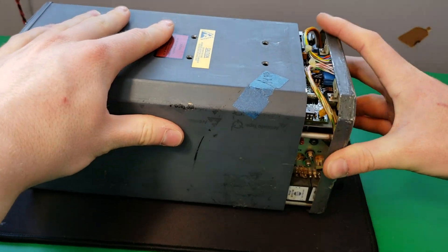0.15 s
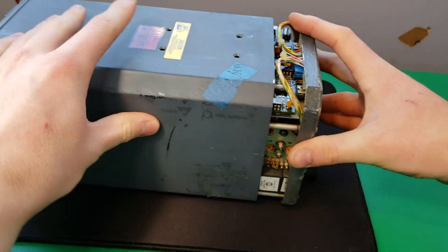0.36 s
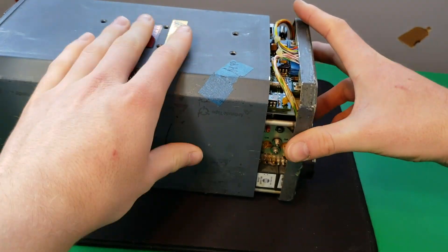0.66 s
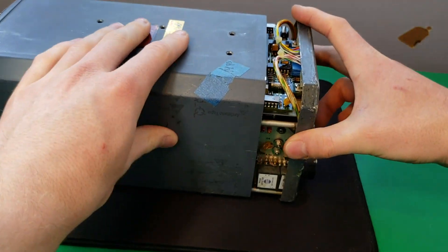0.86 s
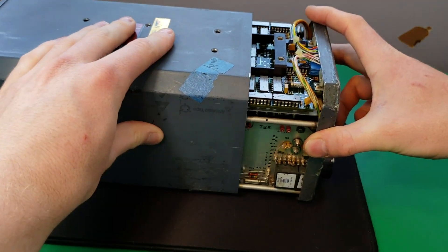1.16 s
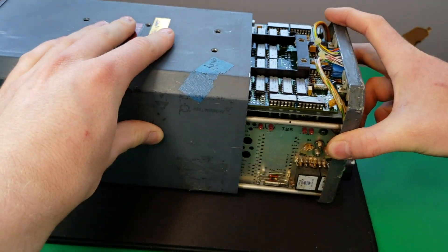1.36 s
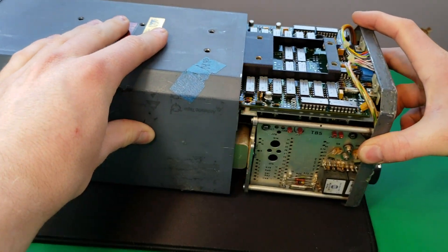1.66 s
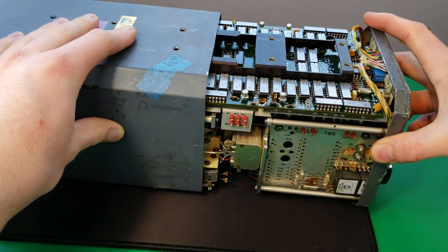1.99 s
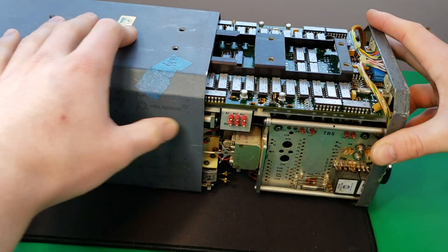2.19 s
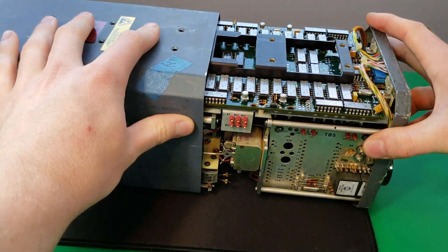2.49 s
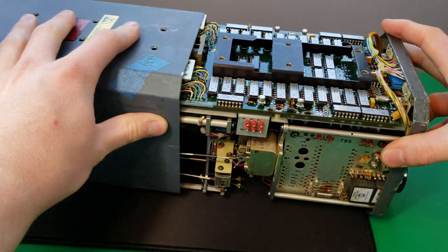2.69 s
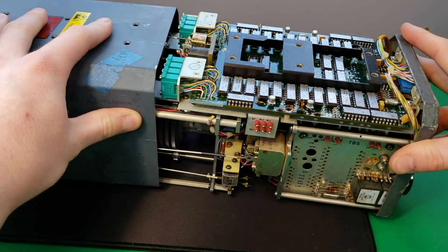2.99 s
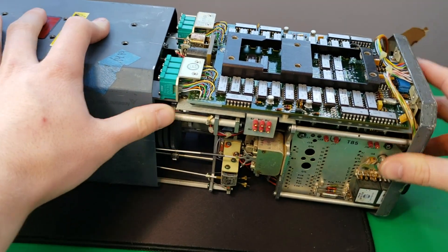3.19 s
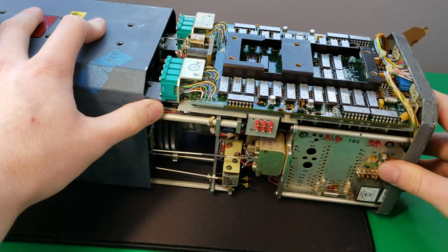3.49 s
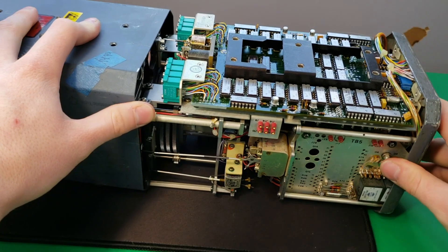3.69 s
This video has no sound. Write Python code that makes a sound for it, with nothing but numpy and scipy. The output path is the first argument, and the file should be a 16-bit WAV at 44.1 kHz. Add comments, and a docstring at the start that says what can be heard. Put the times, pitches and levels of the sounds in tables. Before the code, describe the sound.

Gritty metal scraping in short pulls, then a hard metallic clack as a case slips free

```python
"""Gritty scraping and sharp metal knocks: a thick metal case is pulled off a chassis in several strokes
on a workbench, near a stereo microphone in a small quiet room.
Fine grit hisses as filtered clicks; coarser slips ring the modes of the walls and single walls sing briefly.
Half-sine pushes ring case, chassis and bench, and noise bursts make the cracks of edge on edge.
A short echo, steady air and a faint wavering hum lie behind."""
import sys
import numpy as np
from scipy import signal
from scipy.io import wavfile
from scipy.ndimage import uniform_filter1d

SR = 44100
rng = np.random.default_rng(int(sys.argv[2]) if len(sys.argv) > 2 else 0)


def to_wav(sig):
    """Store sig (one row per channel, or 1-D mono) as 16-bit WAV at the path in sys.argv[1].

    Samples outside -1..1 are clipped; the rate is SR.
    """
    pcm = np.clip(np.atleast_2d(sig), -1, 1) * 32767
    pcm = np.round(pcm).astype(np.int16)
    wavfile.write(sys.argv[1], SR, pcm.T)  # frames by channels


N = 169785  # length [samples]

FREE_S = 2.845  # the case has come free from here on [s]
MONO_HZ = 450  # below this the echo is centred and modes have a smaller phase gap [Hz]


def amp(db):
    """Turns decibels into a linear gain."""
    return 10 ** (np.asarray(db) / 20)


def evened(x):
    """Scales a signal to an RMS of 1."""
    return x / np.sqrt(np.mean(x ** 2) + 1e-20)


def wander(samples):
    """Smoothed noise with an RMS of 1, for slow changes of level."""
    return evened(uniform_filter1d(rng.standard_normal(N), size=samples))


def read(points, hz):
    """Reads a table of values over pitch, interpolating on a log pitch axis."""
    f, value = np.transpose(points)
    return np.interp(np.log(hz + 1), np.log(f + 1), value)


def clicks(per_s, spread_db):
    """A random train of clicks of either sign; a wider spread makes a few of them large."""
    size = amp(spread_db * np.minimum(rng.exponential(1, N), 5)) * rng.choice([-1., 1.], N)
    return evened(size * (rng.random(N) < per_s / SR))


def ring(drive, hz, t60):
    """One mode that passes no steady push; a click of size 1 rings it with height 1."""
    r, w = amp(-60 / (t60 * SR)), 2 * np.pi * hz / SR
    return signal.lfilter([.5, 0, -.5], [1, -2 * r * np.cos(w), r * r], drive)


# Likeness of the two channels: (pitch [Hz], left-right likeness [0-1, clipped])
LIKENESS = [(60, 0.93), (180, 0.9), (550, 0.82), (1650, 0.41), (4970, 0.17), (15000, -0.02)]


def pair(left, other, spectrum, patch_db, size):
    """Colours a drive, adds drifting patches and makes a right channel that is partly unrelated."""
    hz, _, a = signal.stft(left, SR, nperseg=size)
    b = signal.stft(other, SR, nperseg=size)[2]
    patches = uniform_filter1d(rng.standard_normal(a.shape), size=max(6, size // 128), axis=0)
    patches = evened(uniform_filter1d(patches, size=6, axis=1))
    same = np.clip(read(LIKENESS, hz), 0, 1)[:, None]
    right = same * a + np.sqrt(1 - same ** 2) * b
    colour = amp(read(spectrum, hz)[:, None] + patch_db * patches)
    return evened(signal.istft(np.array([a, right]) * colour, SR, nperseg=size)[1][:, :N])


WIDE = .45  # share of the phase gap that the likeness would give


def sides(x, hz):
    """A mode reaches the two ports with a phase gap; small for low modes, large for high ones."""
    gap = np.arccos(np.clip(read(LIKENESS, hz), 0, 1))
    turn = WIDE * gap * min(hz / MONO_HZ, 1) ** 2 * rng.choice([-1, 1])
    quarter = np.gradient(x) / np.sin(2 * np.pi * hz / SR)  # the mode a quarter cycle away
    return np.cos(turn) * x + np.sin(turn) * np.array([quarter, -quarter])


# Friction, one list for each stroke: (time [s], grit hiss level [dB], slips in low walls level [dB],
# slips in high walls level [dB], bench rumble level [dB])
FRICTION_STROKES = [
    [(0.0, -64, -72, -85, -64), (0.012, -47, -48.5, -60, -72), (0.028, -64, -60.5, -67, -61.5),
     (0.102, -75, -91, -85, -84), (0.114, -83, -73, -83, -67), (0.144, -74.5, -76, -89, -74),
     (0.216, -65, -71.5, -72, -69), (0.254, -57, -71, -84, -84), (0.296, -55, -74, -86, -79),
     (0.354, -58, -96, -91, -81), (0.5, -84, -98, -90, -80)],
    [(0.52, -77, -80, -88, -70), (0.576, -70.5, -78, -89, -64.5), (0.588, -69, -57, -66, -56),
     (0.728, -88, -77, -102, -77.5), (0.832, -51.5, -58.5, -67, -70), (0.878, -50, -51.5, -50.5, -77),
     (0.906, -41, -61, -66, -82), (0.916, -39, -47, -49, -70), (1.0, -41.5, -50, -54, -60),
     (1.036, -54, -64, -60, -69), (1.08, -57, -63.5, -59.5, -69)],
    [(1.1, -53.5, -58.5, -65, -74), (1.17, -49.5, -61, -58, -65), (1.344, -46, -57.5, -52.5, -91),
     (1.39, -47.5, -51.5, -62, -53.5), (1.546, -50.5, -52.5, -55.5, -69), (1.566, -42, -60, -60, -64),
     (1.612, -44, -56, -54, -75), (1.724, -44.5, -56, -58, -75), (1.768, -50, -61, -64, -73),
     (1.802, -62, -63, -67, -84), (1.83, -65, -60, -69, -72)],
    [(1.845, -65, -58, -78, -80), (1.861, -51, -43, -60, -81), (1.879, -49.5, -62.5, -64, -72),
     (1.893, -44.5, -73, -63, -68), (1.909, -42, -49, -46.5, -67), (1.931, -43.5, -60.5, -53, -68),
     (1.967, -47, -55, -76, -71), (1.997, -62, -64, -98, -90), (2.005, -77, -54, -84, -80),
     (2.031, -87, -68.5, -80, -66.5), (2.1, -84, -78, -98, -88)],
    [(2.12, -76, -89, -97, -71), (2.17, -69.5, -84, -75, -77), (2.22, -78, -93, -95, -83),
     (2.282, -73, -69.5, -76, -79), (2.408, -75.5, -79, -79, -67), (2.456, -79, -71, -75.5, -81),
     (2.532, -44.5, -54, -58, -72.5), (2.562, -46, -54, -49, -65.5), (2.59, -50, -47.5, -54.5, -58.5),
     (2.664, -44.5, -59, -64, -62), (2.69, -47, -49.5, -60, -54.5)],
    [(2.735, -33.5, -33, -35, -37.5), (2.751, -39.5, -46.5, -46, -37), (2.763, -32.5, -42, -34.5, -47.5),
     (2.797, -35.5, -42.5, -69, -51), (2.827, -46.5, -56.5, -58, -51), (2.859, -58, -48.5, -59, -73),
     (2.871, -80, -68, -71, -60), (2.963, -97, -78, -93, -67.5), (3.003, -80, -69.5, -90, -92),
     (3.05, -84, -97, -96, -78)],
    [(3.1, -83, -99, -95, -93), (3.308, -87, -91, -95, -78), (3.338, -75.5, -67, -100, -67.5),
     (3.43, -67, -64.5, -75, -93), (3.484, -51.5, -57, -79, -69), (3.538, -57, -59.5, -67, -85),
     (3.64, -63.5, -65, -87, -92), (3.676, -57.5, -57, -87, -83), (3.728, -52, -57, -90, -90),
     (3.77, -51, -51.5, -64, -72), (3.85, -57, -52, -86, -72)],
]


def friction_levels():
    """Gain over time of the four layers of friction: the course of the pulling strokes."""
    s, *dbs = np.vstack(FRICTION_STROKES).T
    return [amp(np.interp(np.arange(N) / SR, s, db)) for db in dbs]


# Colour of fine grit, for the hiss and the cracks: (pitch [Hz], relative level per Hz [dB])
GRIT_COLOUR = [(530, -26.5), (900, 0), (1020, -26.5), (1310, -8), (1490, -9.5), (1660, -9.5), (2360, -7),
               (2730, -6), (3910, -5), (5550, -6), (7230, -6.5), (9200, -11), (10800, -5.5), (15100, -4),
               (16000, -8.5)]
GRIT_PER_S, GRIT_PATCH_DB = 6000, 1.5  # clicks [1/s], depth of the patches [dB]
FLICKER_DB = 0.5


def grit_hiss(hiss):
    """Fine grit at the sliding edges: dense equal clicks blur into a hiss whose level flickers."""
    flicker = amp(FLICKER_DB * wander(500))
    drives = [clicks(GRIT_PER_S, spread_db=0) for _ in range(2)]
    return hiss * flicker * pair(*drives, GRIT_COLOUR, GRIT_PATCH_DB, size=512)


SLIPS_PER_S, SLIP_SPREAD_DB = 1500, 2.5
WANDER_DB, WANDER_S, DRIFT = 2.5, .03, .02  # level swing [dB], step [s], share of the pitch


def slips(modes, gain):
    """Coarse slips ring each wall; the contact moves, so each mode comes, goes and drifts in pitch."""
    out, t = np.zeros((2, N)), np.arange(N) / SR
    drive = clicks(SLIPS_PER_S, SLIP_SPREAD_DB)
    power = sum(amp(2 * db) * t60 for hz, db, t60 in modes) * SR / (4 * np.log(1000))
    for hz, db, t60 in modes:
        swell, bend = (np.interp(t / WANDER_S, np.arange(400), v) for v in rng.standard_normal((2, 400)))
        turn = np.exp(2j * np.pi * np.cumsum(hz * (1 + DRIFT * bend)) / SR)
        push = drive * gain * amp(db + WANDER_DB * swell) / turn
        # decay at zero pitch, then turn up to the drifting pitch
        rung = signal.lfilter([1], [1, -amp(-60 / (t60 * SR))], push)
        out += sides((turn * rung).real, hz)
    return out / np.sqrt(power)


# Modes of the walls and the bench: (pitch [Hz], relative level [dB], t60 [s])
# low walls while the case is still on
LOW_WALLS = [(360, -17, 0.03), (375, -2, 0.1), (424.4, -2.5, 0.05), (623, 5, 0.045), (709, -0.5, 0.094),
             (800, -13.5, 0.027), (886, -14, .065)]
# the same walls once the case has come free
FREE_WALLS = [(387.5, -3.5, 0.16), (428, 2, 0.11), (568, 2.5, 0.069), (632, 5, 0.072), (927, -7, 0.11),
              (1097, -4.5, .13), (1790, -6, 0.098), (1990, -22, 0.095)]
# high walls
HIGH_WALLS = [(1223, -2, .05), (1334, -3, 0.15), (1453, 2.5, 0.089), (1557, -7.5, 0.13), (1980, 1, 0.12),
              (2475, -3, 0.048), (3003, 5.5, 0.059), (3430, 8.5, 0.026), (4070, 7, 0.035)]
# bench top
BENCH_MODES = [(60.5, -10.5, 0.071), (81.5, -8, 0.12), (104.3, 0, 0.15), (147, -5.5, 0.12),
               (195, -15.5, 0.05)]


def wall_slips(low, high, rumble):
    """Slips in the case walls and the bench; the low walls change modes when the case comes free."""
    free = np.arange(N) > FREE_S * SR
    walls = slips(LOW_WALLS, low * ~free) + slips(FREE_WALLS, low * free) + slips(HIGH_WALLS, high)
    return walls + slips(BENCH_MODES, rumble)


# Modes of the chassis: (pitch [Hz], relative level [dB], t60 [s])
CHASSIS_MODES = [(335.3, 3, 0.064), (402, -0.5, 0.088), (530, 0, 0.083), (584, -8, 0.12), (780, -2.5, .04),
                 (1180, 7, 0.085), (1600, -5, .06), (1910, -10, 0.1), (2800, -6, .08)]
SPOT_DB, SPOT_OCTAVES = 13.5, 0.2  # boost near the favoured pitch and its spread
BENCH_CONTACT_MS, RISE_CYCLES = 7.5, .22  # bench push length, build-up time of a mode in cycles
HIGH_KNOCK_DB = 4.5  # extra level of the high walls in a knock


def knock(case, case_db, chassis_db, bench_db, contact_ms, spot_hz):
    """A half-sine push; the spot where it lands favours the modes near one pitch."""
    ms = np.arange(SR // 2) * 1000 / SR
    high = [(hz, db + HIGH_KNOCK_DB, t60) for hz, db, t60 in HIGH_WALLS]
    bodies = ((case + high, case_db, contact_ms),
              (CHASSIS_MODES, chassis_db, contact_ms),
              (BENCH_MODES, bench_db, BENCH_CONTACT_MS))
    out = np.zeros((2, len(ms)))
    for modes, blow_db, width in bodies:
        push = np.sin(np.pi * np.clip(ms / max(width, .05), 0, 1))
        body = 0
        for hz, db, t60 in modes:
            spot_db = SPOT_DB * np.exp(-(np.log2(hz / spot_hz) / SPOT_OCTAVES) ** 2)
            rise = 1 - np.exp(-ms * hz / (1000 * RISE_CYCLES))
            body = body + sides(amp(db + spot_db) * rise * ring(push, hz, t60), hz)
        out -= amp(blow_db) * body / abs(body.mean(0)).max()
    return out


# Knocks: (time [s], case level [dB], chassis level [dB], bench level [dB],
# contact on case and chassis [ms], favoured pitch [Hz])
KNOCK_BLOWS = [(0.016, -66, -55, -57, 0.29, 720), (0.543, -62, -58, -56, 0.96, 350),
               (0.5852, -38, -50, -46, 0.8, 385), (0.591, -36, -45, -58.5, 0.92, 377),
               (0.602, -44, -37, -62, 1.96, 385), (0.913, -33.5, -36.5, -56, 0.18, 361),
               (1.377, -34, -54, -56, 0.67, 377), (1.408, -33, -67, -64, 1.2, 360),
               (1.614, -41.5, -52, -74, 0.59, 616), (1.857, -35, -47.5, -54, 0.48, 657),
               (2.003, -43.5, -48, -68, 0.83, 367), (2.469, -54, -64, -67.5, 1.3, 400),
               (2.593, -36.5, -59.5, -59, 0.89, 354), (2.702, -19.5, -5, -29.5, 1.06, 489),
               (2.7114, -27, -12, -29.5, 1.2, 380), (2.7165, -22, -20, -27.5, 0.27, 705),
               (2.7274, -29, -16.5, -24, 0.81, 342), (2.85, -36, -56, -64, 0.63, 640),
               (3.775, -35, -59, -56, 0.65, 399), (3.839, -44, -44.5, -67, 0.8, 415)]
KNOCK_LOW_HZ = 55  # knocks are thinned below this


def knocks():
    """Each knock rings case, chassis and bench; the case has other modes once it is free."""
    out = np.zeros((2, N))
    for s, *blow in KNOCK_BLOWS:
        at = round(s * SR)
        sound = knock(LOW_WALLS if s < FREE_S else FREE_WALLS, *blow)
        out[:, at:at + sound.shape[1]] += sound[:, :N - at]
    return signal.lfilter(*signal.butter(2, KNOCK_LOW_HZ, "high", fs=SR), out)


# Cracks of an edge on an edge: (time [s], relative level [dB], dull above [Hz], t60 [s])
EDGE_CRACKS = [(.012, -62, 6000, 0.034), (0.59, -42, 5000, 0.043), (.755, -60.5, 6000, 0.024),
               (0.915, -47, 9000, .03), (1.378, -30, 3000, 0.038), (1.856, -33, 2500, 0.029),
               (2.003, -56, 2000, .02), (2.159, -50.5, 9000, 0.041), (2.289, -52.5, 7000, 0.03),
               (2.7018, -12.5, 4874, 0.15), (2.715, -13, 14000, 0.042), (2.728, -24.5, 6000, 0.044),
               (2.759, -26.5, 5000, 0.066), (2.851, -34, 2000, 0.034), (3.777, -39.5, 5000, 0.065)]
CRACK_RISE_S = 0.0008


def cracks():
    """Short bursts of grit-coloured noise, duller for softer contacts."""
    out, t = np.zeros((2, N)), np.arange(SR // 5) / SR
    grit = pair(*rng.standard_normal((2, N)), GRIT_COLOUR, GRIT_PATCH_DB, size=256)
    for s, db, dull_hz, t60 in EDGE_CRACKS:
        at = round(s * SR)
        part = grit[:, at:at + len(t)]
        shape = amp(db - 60 * t / t60) * (1 - np.exp(-t / CRACK_RISE_S))
        burst = part * shape[:part.shape[1]]
        dull = signal.butter(2, min(dull_hz, SR / 2.2), fs=SR)
        out[:, at:at + len(t)] += signal.lfilter(*dull, burst)
    return out


# One wall sings while the edge catches: (time [s], length of catch [s], pitch [Hz], relative level [dB])
WALL_SQUEAKS = [(0.852, 0.034, 361, -48.5), (0.913, 0.027, 1247, -44.5), (0.917, 0.04, 2300, -44.5),
                (.971, .024, 4004, -43), (0.979, 0.033, 2387, -46), (1.186, 0.024, 2168, -50.5),
                (1.591, 0.1, 661.5, -48.5), (1.604, 0.032, 1443, -45.5), (1.856, 0.011, 1900, -48.5),
                (1.864, 0.029, 898, -49), (1.892, 0.086, 903, -57), (1.861, 0.021, 1427, -49),
                (1.862, 0.05, 4030, -55), (1.88, 0.032, 3430, -51), (1.897, 0.056, 724, -47),
                (1.907, 0.083, 1423, -60), (2.515, 0.1, 1945, -55.5), (2.747, 0.034, 1910, -46),
                (2.845, 0.072, 910, -56), (3.443, 0.09, 7110, -60)]
SQUEAK_T60_S, SQUEAK_ROUGH = .025, 0.55  # ring time [s], weight of the rough part


def squeaks():
    """Slips lock to one mode for a moment, partly regular and partly rough."""
    out, t, grain = np.zeros((2, N)), np.arange(N) / SR, rng.standard_normal(N)
    for s, length, hz, db in WALL_SQUEAKS:
        catch = (t > s) & (t < s + length)
        steady = ring(catch * np.sin(2 * np.pi * hz * t), hz, SQUEAK_T60_S)
        rough = ring(catch * grain, hz, SQUEAK_T60_S)
        mixed = (1 - SQUEAK_ROUGH) * evened(steady) + SQUEAK_ROUGH * evened(rough)
        # the root undoes the boost that evening over the whole length gives a short sound
        out += sides(amp(db) * mixed * np.sqrt(catch.mean()), hz)
    return out


# Echo of the small room: (pitch [Hz], t60 [s])
ROOM_T60 = [(100, 0.14), (500, 0.2), (3000, 0.28), (12000, 0.22)]


def room(x):
    """Sparse taps of random sign, each band dying at its own speed; the low echo is centred."""
    taps, slots = np.zeros((2, SR // 2)), np.arange(200, SR // 2 - 20, 20)
    at = slots + rng.integers(0, 20, (2, len(slots)))
    np.put_along_axis(taps, at, rng.choice([-1., 1.], at.shape), 1)
    hz, t, z = signal.stft(taps, SR, nperseg=256)
    fade = amp(-60 * t / read(ROOM_T60, hz)[:, None])
    tail = signal.istft(z * fade, SR, nperseg=256)[1]
    wet = signal.fftconvolve(x, tail / np.linalg.norm(tail[0]), axes=1)[:, :N]
    low = signal.lfilter(*signal.butter(2, MONO_HZ, fs=SR), wet)
    return wet - low + low.mean(0)


# Colour of the air in the room: (pitch [Hz], relative level per Hz [dB])
AIR_COLOUR = [(26, -33), (45, -2), (70, -19), (114, -8.5), (212, -31), (291, -17.5), (476, -9.5),
              (525, -11.5), (672, -27), (723, -14), (798, -30), (1400, -45.5), (2000, -28), (2300, -18.5),
              (2900, -20), (4350, -36), (16000, -37.5)]
AIR_DB = -67


def room_air():
    """The steady air of the room: coloured noise with slowly drifting patches."""
    return amp(AIR_DB) * pair(*rng.standard_normal((2, N)), AIR_COLOUR, patch_db=3.0, size=4096)


HUM_HZ, HUM_DB = 29.7, -70


def hum():
    """A faint low hum, one sine that wavers in level."""
    level = amp(HUM_DB + 0.83 * wander(4000))
    return level * np.sqrt(2) * np.sin(2 * np.pi * HUM_HZ * np.arange(N) / SR)


ROOM_DB = -11.5  # echo against the near sound
LEFT_DB = 1.1  # left is raised and right lowered by this
CENTRED_HZ = 130  # the bass below this is left out of that tilt


def scene():
    """Friction and knocks with their echo, over the steady air of the room and the hum."""
    hiss, low, high, rumble = friction_levels()
    near = grit_hiss(hiss) + wall_slips(low, high, rumble) + knocks() + cracks() + squeaks()
    heard = near + amp(ROOM_DB) * room(near) + room_air()
    upper = signal.filtfilt(*signal.butter(2, CENTRED_HZ, "high", fs=SR), heard)
    return heard - upper + upper * amp([[LEFT_DB], [-LEFT_DB]]) + hum()


EDGE_HZ = 15850  # top of the band


def record(dry):
    """The band limit: a steep low-pass without phase shift."""
    low_pass = signal.firwin(511, EDGE_HZ, window=("kaiser", 9), fs=SR)
    return signal.oaconvolve(dry, low_pass[None], "same")


dry = scene()
out = record(dry)
to_wav(out)
```